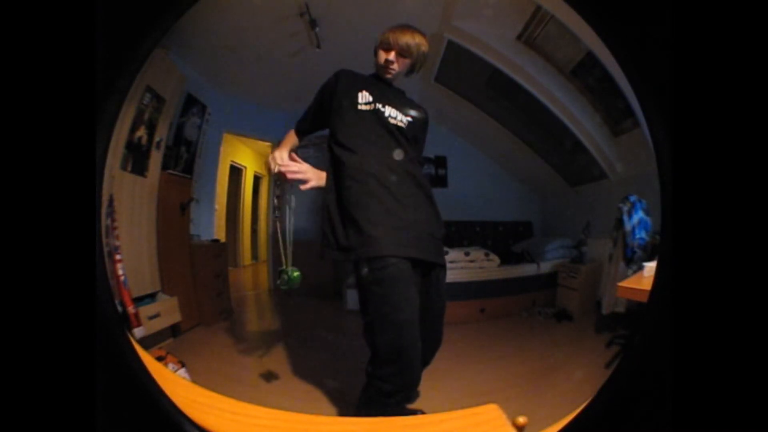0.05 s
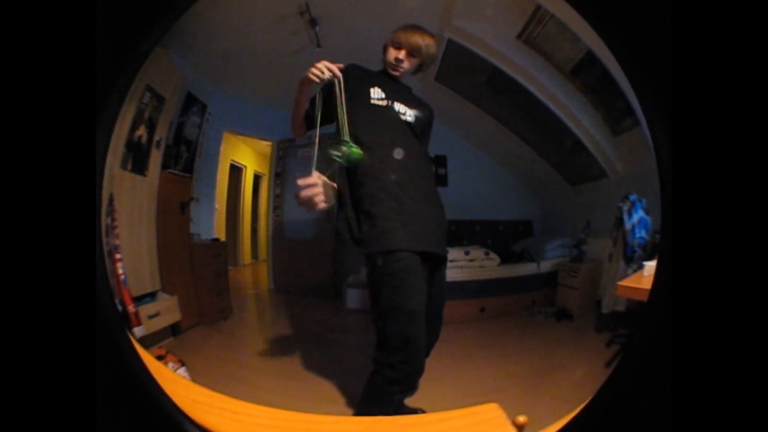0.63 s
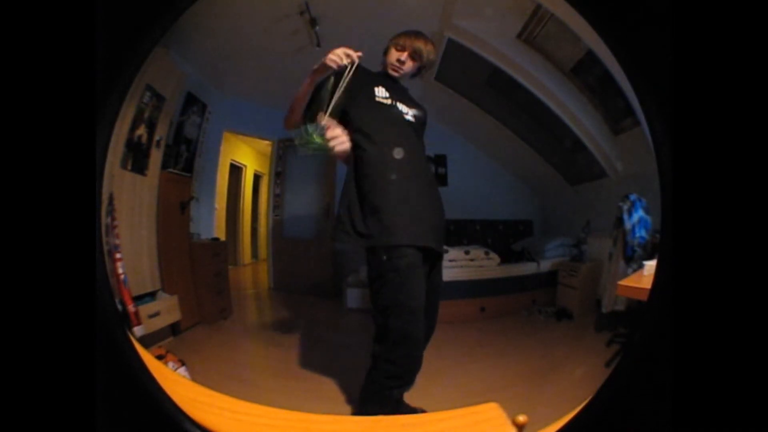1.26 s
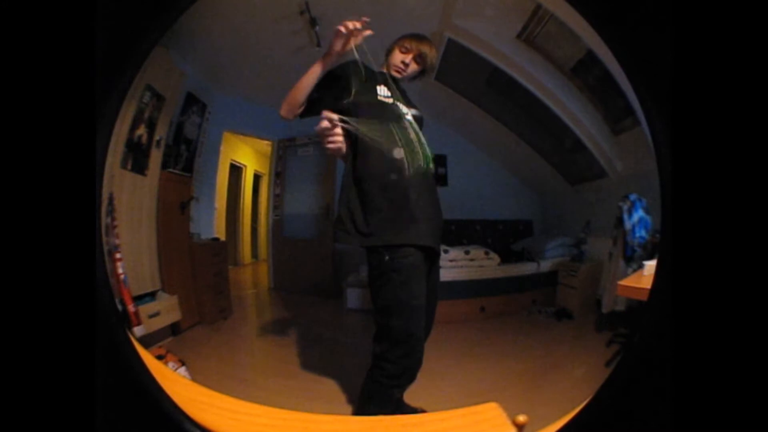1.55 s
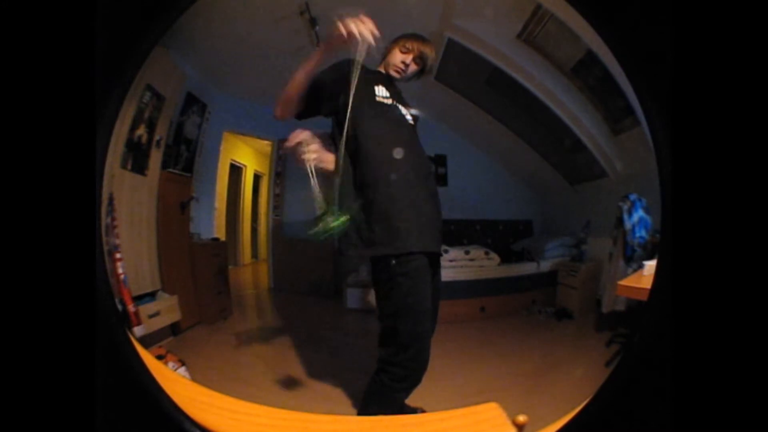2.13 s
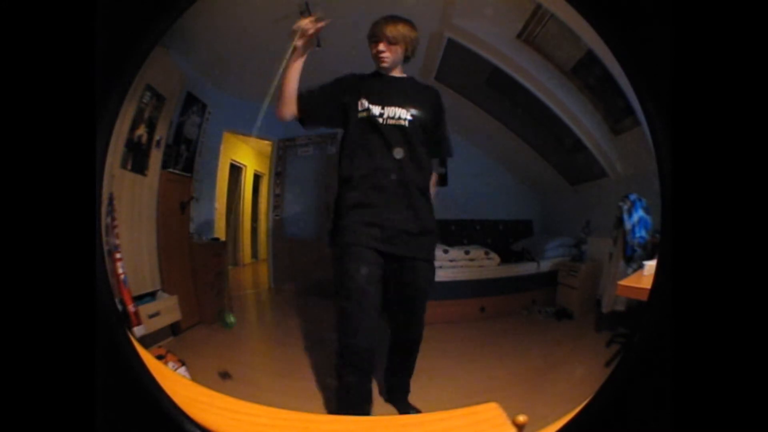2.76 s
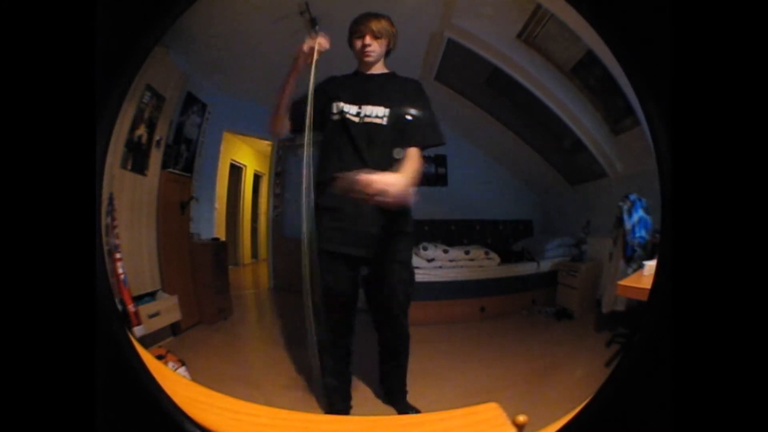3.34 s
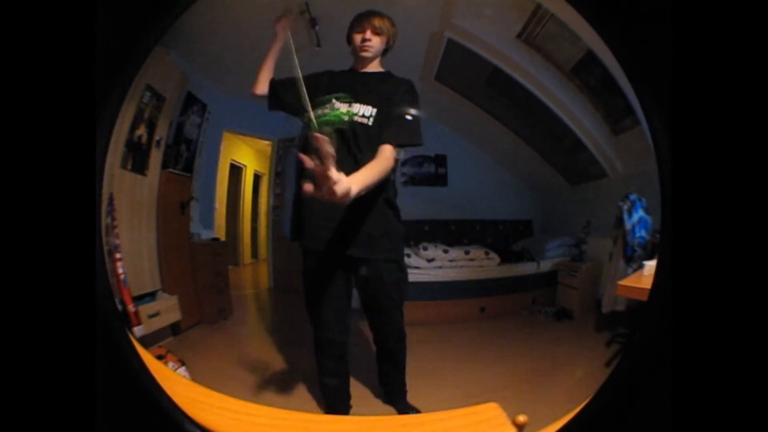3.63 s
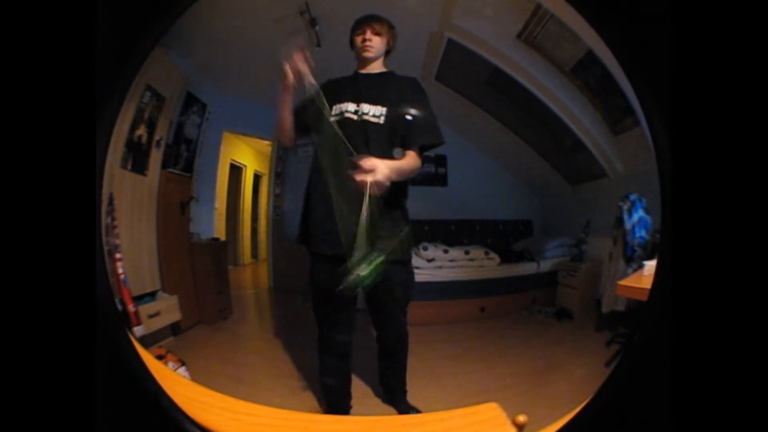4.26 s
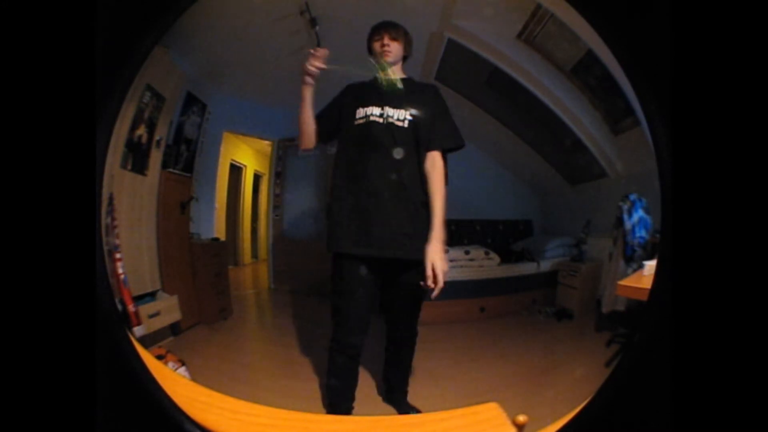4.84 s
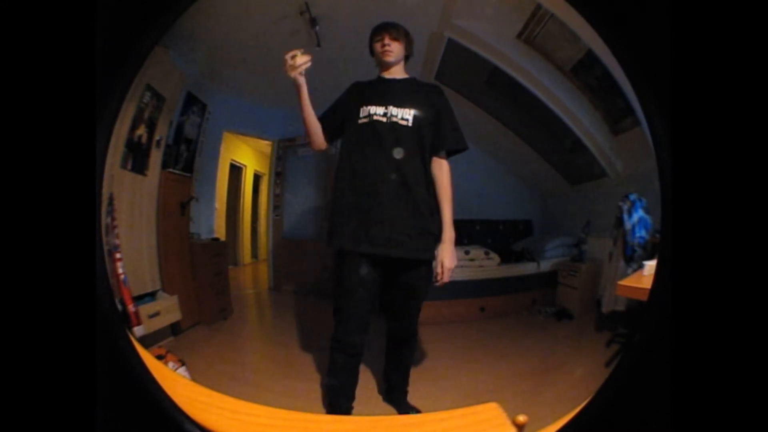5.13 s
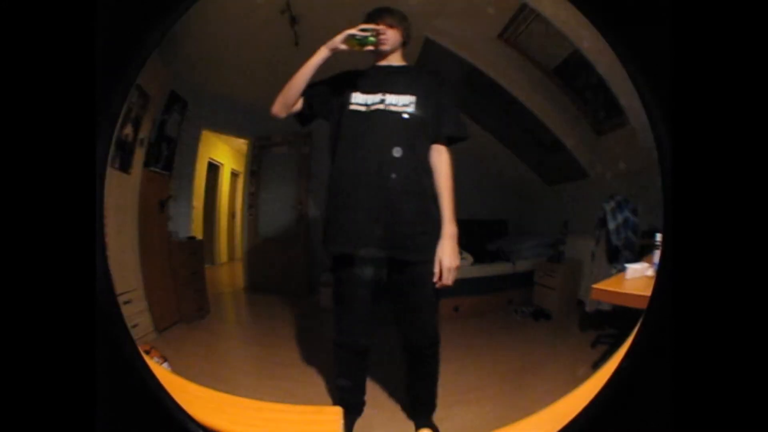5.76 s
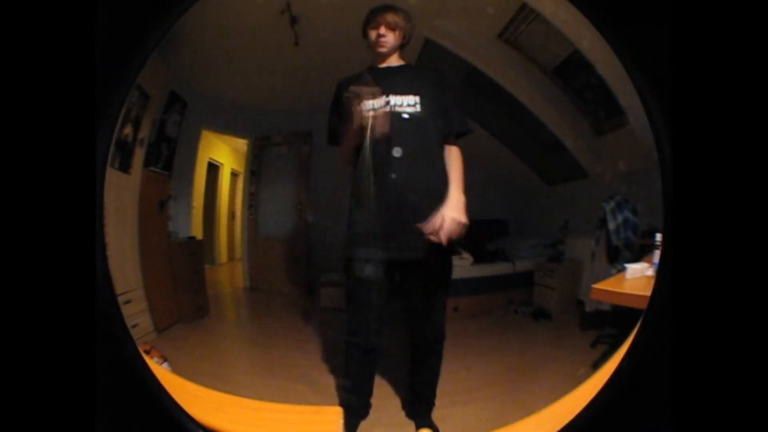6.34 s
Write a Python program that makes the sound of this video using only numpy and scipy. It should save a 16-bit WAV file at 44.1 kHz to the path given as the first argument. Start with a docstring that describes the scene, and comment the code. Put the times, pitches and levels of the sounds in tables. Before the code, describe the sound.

A yo-yo's dry bearing whirrs and its string hisses and snaps in a quiet room, with one catch in the hand and another throw.

```python
"""Yo-yo tricks in a quiet bedroom

A spinning yo-yo's dry ball bearing rattles and rings. The string hisses against the turning
halves and sings lengthwise as its free span changes. The yo-yo binds, climbs and smacks into
the palm; after a rest it is thrown again. Sleeves brush softly over a low room tone."""
import sys
import numpy as np
from scipy import signal
from scipy.fft import rfft, irfft, next_fast_len
from scipy.io import wavfile
from scipy.ndimage import uniform_filter1d, map_coordinates

SR = 44100
rng = np.random.default_rng(int(sys.argv[2]) if len(sys.argv) > 2 else 0)


def bounce(signal):
    """Save signal as a 16-bit WAV file at the path given by the first command-line argument."""
    frames = np.transpose(np.atleast_2d(signal))
    limited = np.clip(frames, -1, 1)
    pcm = np.round(limited * 32767).astype(np.int16)
    wavfile.write(sys.argv[1], SR, pcm)


N = 286650
TIME = np.arange(N) / SR


def amp(db):
    """Decibels to gain."""
    return 10 ** (np.asarray(db) / 20)


def unit(x):
    """x at rms 1."""
    return x / np.sqrt(np.mean(x ** 2) + 1e-20)


def along(points, hz):
    """(frequency, value) points read on a log axis."""
    freqs, values = np.transpose(points)
    return np.interp(np.log(hz + 1), np.log(freqs + 1), values)


def automation(points):
    """(time, value) points joined into one value per sample."""
    return np.interp(TIME, *np.transpose(points))


def wobble(rate):
    """A smooth random curve, rate knots a second."""
    return map_coordinates(rng.standard_normal(int(N * rate / SR) + 4), [TIME * rate])


def filtered(x, response):
    """x through a complex frequency response."""
    size = next_fast_len(len(x) + 8192)
    return irfft(rfft(x, size) * response(np.fft.rfftfreq(size, 1 / SR)), size)[:len(x)]


def coloured(x, eq):
    """x through an EQ curve, at rms 1."""
    return unit(filtered(x, lambda hz: amp(along(eq, hz))))


def resonate(x, modes):
    """x through parallel (frequency, width, gain) resonances."""
    return filtered(x, lambda hz: sum(amp(db) * 1j * hz * width / (centre**2 - hz**2 + 1j * hz * width)
                                      for centre, width, db in modes))


def swept(x, pitch, gain_at):
    """x through a filter gain_at(frequency, pitch) that follows a pitch curve, at rms 1."""
    hz, t, frames = signal.stft(x, SR, nperseg=512)
    gain = gain_at(hz[:, None], np.interp(t, TIME, pitch))
    return unit(signal.istft(frames * gain, nperseg=512)[1][:N])


def shimmer(x, depth_db):
    """x with passing resonances a few hundred Hz wide, at rms 1."""
    frames = signal.stft(x, nperseg=256)[2]
    patches = uniform_filter1d(rng.standard_normal(frames.shape), size=3, axis=0)
    patches = uniform_filter1d(patches, size=11, axis=1)
    return unit(signal.istft(frames * amp(depth_db * unit(patches)), nperseg=256)[1][:N])


def grains(rate, spread_db):
    """Tiny contacts at random times, of uneven size, at rms 1."""
    contacts = (rng.random(N) < rate / SR) * rng.standard_normal(N)
    return unit(contacts * amp(spread_db * rng.standard_normal(N)))


def decay(start, t60, attack):
    """The envelope of a hit."""
    age = np.maximum(TIME - start, 0)
    return amp(-60 * np.minimum(age / t60, 3)) * (1 - np.exp(-age / attack))


def swell(start, length, attack=0.015, t60=0.19):
    """Attack, hold and release of a sliding contact."""
    age = TIME - start
    fade_in = np.sin(np.pi / 2 * np.clip(age / attack, 0, 1)) ** 2
    return fade_in * amp(-60 * np.clip((age - length) / t60, 0, 3))


def add(track, start, sound):
    """Mix a short sound into the track, start seconds in."""
    part = track[round(start * SR):][:len(sound)]
    part += sound[:len(part)]


# EQ of the room's air: (frequency [Hz], gain [dB])
AIR_EQ = [(25, -29), (60, -19.5), (125, -6), (300, -4), (750, -1.5), (1150, -7.5), (2000, -8.5),
          (4000, -14), (7500, -18), (12000, -21), (14000, -21), (15800, -32)]
# low resonances of the hum: (frequency [Hz], width [Hz], gain [dB])
HUM_MODES = [(129.4, 10, -7.5), (612.5, 27, 6), (776, 104, 2)]
# partials of the electronic whine: (frequency [Hz], rms level [dB])
WHINE_PARTIALS = [(4743, -70), (9482, -72), (14225, -82)]


def room_tone():
    """A steady bed of air with a hollow hum and a faint, wavering electronic whine."""
    air = amp(-48.86) * coloured(rng.standard_normal(N), AIR_EQ)
    hum = amp(-56.5) * unit(resonate(rng.standard_normal(N), HUM_MODES))
    drifting_time = TIME + np.cumsum(0.00115 * wobble(13)) / SR
    whine = sum(amp(db) * np.sqrt(2) * np.sin(2 * np.pi * hz * drifting_time) for hz, db in WHINE_PARTIALS)
    return air + hum + whine


# the bedroom's reverb time: (frequency [Hz], t60 [s])
REVERB_T60 = [(200, 0.52), (2000, 0.45), (12000, 0.25)]


def bedroom_reverb(send):
    """A short diffuse tail after a 5 ms pre-delay, duller as it dies."""
    hz, t, frames = signal.stft(rng.standard_normal(SR // 2), SR, nperseg=256)
    tail = signal.istft(frames * amp(-60 * t / along(REVERB_T60, hz)[:, None]), SR, nperseg=256)[1]
    impulse = np.pad(tail, (SR // 200, 0)) / np.linalg.norm(tail)
    return signal.fftconvolve(send, impulse)[:N]


# EQ of sleeve on shirt: (frequency [Hz], gain [dB])
CLOTH_EQ = [(40, -45), (200, -22), (480, -2), (680, -4), (1000, -13), (2500, -13), (5000, -8), (9000, -17),
            (16000, -32)]
# swings of the arm: (start [s], length [s], level [dB])
SWINGS = [(2.803, 0.18, -49.5), (2.97, .07, -43.5), (4.6, .38, -53.5), (5.872, 0.13, -52.5),
          (6.163, 0.26, -50)]
SOFT_ATTACK_S, SOFT_T60_S = 0.039, 0.32


def sleeve():
    """Cloth brushes softly with each swing of the arm."""
    brush = sum(amp(db) * swell(start, length, SOFT_ATTACK_S, SOFT_T60_S) for start, length, db in SWINGS)
    return brush * coloured(rng.standard_normal(N), CLOTH_EQ)


# EQ of the slap on skin: (frequency [Hz], gain [dB])
PALM_EQ = [(200, -22), (600, -3), (1100, -11), (2200, -9), (4000, -18), (6000, -9), (8000, -14), (11000, 3),
           (13500, -3), (16000, -14)]
# hollow of the cupped hand: (frequency [Hz], width [Hz], gain [dB])
HAND_MODES = [(356, 42, -14), (467, 69, 3), (620, 91, 2), (1040, 75, 1)]
# ring of the yo-yo's halves: (frequency [Hz], relative level [dB], t60 [s])
SHELL_MODES = [(4807, -8, .06), (7300, -14, .07), (10490, -7, .08), (11780, -1, .18)]
# the yo-yo lands in the hand: (time [s], slap level [dB], thump level [dB], ring gain [dB])
LANDING = (5, -30, -36.5, -33.5)


def palm_catch():
    """The palm gives a soft slap and a hollow thump; the shell rings unevenly in the closing fingers."""
    start, slap_db, thump_db, ring_db = LANDING
    slap = decay(start, t60=0.068, attack=0.00095) * coloured(rng.standard_normal(N), PALM_EQ)
    thump = decay(start, t60=0.13, attack=0.0012) * unit(resonate(rng.standard_normal(N), HAND_MODES))
    jitter = wobble(500)
    ring = sum(amp(db) * decay(start, t60, attack=0.00091) * np.sin(2 * np.pi * hz * TIME + jitter)
               for hz, db, t60 in SHELL_MODES)
    return amp(slap_db) * slap + amp(thump_db) * thump + amp(ring_db) * ring


# EQ of the string's bright crack: (frequency [Hz], gain [dB])
CRACK_EQ = [(500, -37), (1500, -13), (3300, -1), (6000, -11), (10000, 5.5), (13000, 13), (16000, -17)]
# EQ of its dull tug on the finger: (frequency [Hz], gain [dB])
TUG_EQ = [(50, -45), (300, -14), (700, -3), (1500, -3), (2200, -3), (3500, -11), (8000, -16)]
# the string snaps tight or bites into the gap: (time [s], crack peak [dB], tug level [dB])
SNAP_CUES = [(1.633, -12.5, -53), (3.657, -13, -46), (3.919, -7.5, -42), (4.7165, -8, -61),
             (6.219, -22, -56), (6.361, -15.5, -49), (6.4194, -10.5, -32.5)]


def string_snaps():
    """A dry crack, a short rasp and a dull tug each time the string jerks taut."""
    jerks = np.zeros(N)
    for start, db, _ in SNAP_CUES:
        add(jerks, start, amp([db]))
    crack = coloured(jerks, CRACK_EQ)
    crack *= jerks.max() / np.abs(crack).max()
    rasp = sum(amp(db - 9) * decay(start, t60=0.03, attack=0.0004) for start, db, _ in SNAP_CUES)
    tug = sum(amp(db) * decay(start, t60=0.072, attack=0.001) for start, _, db in SNAP_CUES)
    rasp_noise, tug_noise = rng.standard_normal((2, N))
    return crack + rasp * coloured(rasp_noise, CRACK_EQ) + tug * coloured(tug_noise, TUG_EQ)


# spin of the yo-yo: (time [s], speed [turns/s])
SPIN_SPEED = [(0, 56), (2.4, 57), (3.7, 85), (4.6, 47), (5, 36), (6.1, 20), (6.45, 90)]


def rotation():
    """The yo-yo's angle in radians, turning at a slightly unsteady speed."""
    speed = automation(SPIN_SPEED) * (1 + 0.037 * wobble(17))
    return 2 * np.pi * np.cumsum(speed) / SR


def pressure(angle, once_db, twice_db, flutter_db):
    """Contact force swells once and twice a turn as the yo-yo wobbles, and flutters between."""
    return amp(once_db * np.sin(angle) + twice_db * np.sin(2 * angle) + flutter_db * wobble(450))


# moves that drag the string along the gap:
# (start [s], length [s], hiss fader [dB], song fader [dB], start pitch [Hz], end pitch [Hz])
STROKE_CUES = [(.07, 0.071, -38, -63, 2300, 2250), (.63, .08, -37, -69, 2270, 2100),
               (.8, 0.42, -47, -56, 2250, 2480), (1.09, .08, -30.5, -39.5, 2800, 2400),
               (1.17, .08, -30.5, -44.5, 1810, 1900), (1.27, 0.086, -30.5, -40.5, 2670, 2480),
               (1.4, .19, -43, -70, 2100, 2100), (1.605, 0.095, -30.5, -46.5, 1970, 1900),
               (1.78, 0.16, -34, -46.5, 1830, 1950), (2.06, 0.14, -36, -48, 2030, 1900),
               (2.19, .15, -31, -42, 1930, 1820), (2.35, 0.075, -39, -60, 2100, 2170),
               (2.655, 0.13, -34.5, -49.5, 2050, 2050), (2.98, 0.032, -39, -47, 2400, 2320),
               (3.37, 0.28, -36.5, -54.5, 2090, 2090), (3.62, 0.058, -29, -43, 2200, 2240),
               (3.73, 0.21, -35, -47.5, 1900, 2200), (3.9, .11, -32, -38.5, 3250, 3000),
               (4.02, .11, -39, -45, 2400, 1870), (4.14, .14, -32.5, -41, 2720, 2100),
               (4.3, 0.2, -38, -69, 2060, 2500), (4.49, 0.059, -32, -46, 2060, 2000),
               (4.57, 0.095, -39, -49, 1930, 1880)]


def strokes():
    """Each move swells the power of hiss and song and glides the span's pitch, which then holds."""
    hiss_power, song_power = np.zeros((2, N))
    pitch = np.full(N, float(STROKE_CUES[0][4]))
    for start, length, hiss_db, song_db, from_hz, to_hz in STROKE_CUES:
        stroke = swell(start, length)
        hiss_power += (amp(hiss_db) * stroke) ** 2
        song_power += (amp(song_db) * stroke) ** 2
        glide = np.interp(TIME, [start, start + length], [from_hz, to_hz])
        pitch = np.where(TIME < start, pitch, glide)
    return hiss_power, song_power, pitch


# the rattle follows the load on the string, dipping while the yo-yo floats: (time [s], fader [dB])
STRING_LOAD = [(0, -32), (.35, -32.5), (.55, -30), (1.5, -31), (2.05, -29.5), (2.4, -27.5), (2.53, -42.5),
               (2.62, -44.5), (2.67, -30.5), (2.85, -35), (3.45, -32), (3.65, -26.5), (4.25, -29.5),
               (4.55, -32), (4.7, -41)]
# fingers shift on the shell and settle the string: (start [s], length [s], hiss fader [dB])
FINGER_SHIFT = (5.55, 0.53, -61)
BIND_S, GRIP_S, THROW_S, UNWOUND_S = 4.715, 0.072, 6.125, 6.415
UNWIND_DB, UNWIND_DB_PER_S, SLEEP_DB = -51.5, 57, -29
GRAZE_HISS_DB, GRAZE_SONG_DB = -6.5, -31  # a hanging string always grazes the gap


def trick_faders(stroke_hiss_power, stroke_song_power):
    """Gains of rattle, hiss and song as the yo-yo hangs, binds, climbs, rests and is thrown."""
    hanging = amp(automation(STRING_LOAD)) * swell(-1.03, 1 + BIND_S + GRIP_S)
    grip = amp(-37.5) * swell(BIND_S, GRIP_S, attack=0.008, t60=0.052)
    climb = amp(-52.5) * swell(BIND_S, LANDING[0] - BIND_S)
    start, length, db = FINGER_SHIFT
    fingers = amp(db) * swell(start, length, SOFT_ATTACK_S, SOFT_T60_S)
    # the throw builds as it unwinds, then sleeps at full speed at the end of the string
    throw_db = np.where(TIME < UNWOUND_S, UNWIND_DB + UNWIND_DB_PER_S * (TIME - THROW_S), SLEEP_DB)
    thrown = amp(throw_db) * np.clip((TIME - THROW_S) / 0.02, 0, 1)
    rattle = hanging + amp(-1.5) * thrown
    hiss_power = (amp(GRAZE_HISS_DB) * hanging) ** 2 + grip ** 2 + climb ** 2 + fingers ** 2 + thrown ** 2
    song_power = (amp(GRAZE_SONG_DB) * hanging) ** 2 + (amp(-16) * thrown) ** 2
    return rattle, np.sqrt(hiss_power + stroke_hiss_power), np.sqrt(song_power + stroke_song_power)


# EQ of the string's free span: (frequency [Hz], gain [dB])
SPAN_EQ = [(1400, -44), (1650, 1.5), (1780, 7.5), (2800, 2), (3800, -1), (5200, 4), (7000, -9), (9000, 1.5),
           (12300, 12.5), (14000, -2), (16000, 5)]


def string_song(angle, pitch, reflection=0.62):
    """Friction waves run to and fro along the string: a comb of resonances that slides with its length."""
    def comb(hz, span_hz):
        return amp(along(SPAN_EQ, hz)) / np.abs(1 - reflection * np.exp(2j * np.pi * hz / span_hz))
    force = pressure(angle, once_db=-0.4, twice_db=1.0, flutter_db=0.9)
    slips = force * grains(rate=13000, spread_db=1.2)
    return amp(6) * swept(shimmer(slips, depth_db=2.4), pitch, comb)


# brief gliding bands of sliding string; the last is the bearing's ring sagging as the yo-yo binds:
# (start [s], length [s], start pitch [Hz], end pitch [Hz], level [dB])
GLIDE_CUES = [(0, 0.5, 6720, 7240, -44.5), (0.422, 0.4, 5950, 6040, -45), (0.75, 0.37, 7200, 7800, -38),
              (1.096, 0.11, 12500, 11100, -29), (1.176, 0.022, 6070, 6050, -34.5),
              (1.195, .11, 12000, 12700, -27.5), (1.263, 0.072, 5600, 5150, -36),
              (1.345, .072, 11700, 10360, -30.5), (1.393, 0.067, 6160, 6300, -38),
              (1.533, .062, 5990, 5680, -40.5), (1.6, .035, 8000, 9100, -28),
              (1.65, 0.088, 8700, 7300, -38), (1.82, .17, 11500, 10600, -35),
              (2.425, 0.047, 6130, 4940, -40), (3.562, .078, 6800, 7800, -34),
              (3.762, 0.15, 12400, 11440, -29.5), (3.908, .12, 13100, 12700, -31),
              (4.04, 0.1, 11300, 12150, -28), (4.116, 0.021, 8200, 8360, -26.5),
              (4.125, .08, 6000, 4730, -37.5), (4.15, .14, 12400, 11500, -27),
              (4.174, 0.11, 8700, 8320, -30.5), (4.3, 0.38, 7330, 7500, -42.5),
              (4.668, 0.14, 4920, 4950, -45.5)]


def gliding_bands(angle, width_hz=640):
    """Rough bands glide as sliding string shortens or lengthens; the last is the bearing's sagged ring."""
    bands = np.zeros(N)
    force = unit(pressure(angle, once_db=2.5, twice_db=-0.5, flutter_db=2.5))
    lowpass = signal.butter(2, width_hz / 2, fs=SR, output="sos")
    for start, length, from_hz, to_hz, db in GLIDE_CUES:
        progress = np.linspace(0, 1, round(length * SR))
        roughness = signal.sosfilt(lowpass, rng.standard_normal((2, SR)))[:, -len(progress):]
        phase = 2 * np.pi * np.cumsum(from_hz + (to_hz - from_hz) * progress) / SR
        band = unit(roughness[0] * np.cos(phase) + roughness[1] * np.sin(phase))
        arch = np.abs(np.sin(np.pi * progress)) ** 0.5
        add(bands, start, amp(db) * arch * band)
    return bands * force


# EQ of string rubbing in the gap: (frequency [Hz], gain [dB])
HISS_EQ = [(1500, -54), (3500, -24), (4200, -34), (4800, -14.5), (6600, -11), (8300, -2.5), (9100, -2.5),
           (10700, 3.5), (12300, -4), (13300, -7.5), (13900, -8), (15200, -8.5), (15800, -9.5)]


def string_hiss(angle):
    """String fibres catch and slip on the spinning walls of the gap."""
    slips = grains(rate=24000, spread_db=0.8) * pressure(angle, once_db=1.2, twice_db=1.1, flutter_db=1.3)
    return amp(2) * coloured(shimmer(slips, depth_db=3), HISS_EQ)


# the bearing catches for an instant: (time [s], peak [dB])
SQUEAK_CUES = [(0.638, -15), (0.7448, -9), (1.012, -14.5), (1.388, -13.5), (2.385, -15), (3.674, -16),
               (4.784, -20)]


def bearing_squeaks(rattle_gain, ring_hz=9900, low_hz=5170, rise_s=0.00061, fall_s=0.0014, per_s=3):
    """Each catch pings the main ring and a lower one; chance catches ride the rattle's fader."""
    t = np.arange(-SR // 100, SR // 100) / SR
    envelope = np.exp(-np.where(t < 0, (t / rise_s) ** 2, t / fall_s))
    ping = envelope * (np.sin(2 * np.pi * ring_hz * t) + amp(-17) * np.sin(2 * np.pi * low_hz * t))
    catches = (rng.random(N) < per_s / SR) * amp(8) * rattle_gain
    for start, db in SQUEAK_CUES:
        add(catches, start, amp([db]))
    return signal.fftconvolve(catches, ping, mode="same")


# steel rings of the bearing: (frequency [Hz], width [Hz], gain [dB])
BEARING_MODES = [(5170, 137, -6), (6170, 340, -20), (9684, 230, -1), (9930, 194, -2), (9955, 160, -1),
                 (14200, 350, -14)]


def bearing_rattle(angle, waver_db=1.5):
    """Dry balls chatter in the races and ring them; each ring waxes and wanes as the axle tilts."""
    chatter = grains(rate=14000, spread_db=1) * pressure(angle, once_db=0.6, twice_db=-0.5, flutter_db=3.1)
    rings = sum(amp(waver_db * wobble(12)) * resonate(chatter, [mode]) for mode in BEARING_MODES)
    return amp(-1.5) * unit(rings)


def scene():
    """The mono mix: bearing and string share one rotation; whirr and hits feed the reverb."""
    angle = rotation()
    stroke_hiss_power, stroke_song_power, pitch = strokes()
    rattle_gain, hiss_gain, song_gain = trick_faders(stroke_hiss_power, stroke_song_power)
    rattle = rattle_gain * bearing_rattle(angle)
    hiss = hiss_gain * string_hiss(angle)
    song = song_gain * string_song(angle, pitch)
    whirr = rattle + hiss + song + gliding_bands(angle) + bearing_squeaks(rattle_gain)
    hits = string_snaps() + palm_catch()
    send = amp(-9.5) * whirr + amp(-4.5) * hits
    return (whirr + hits + sleeve() + bedroom_reverb(send) + room_tone())[None]


HIGH_CUT_HZ = 15760


def record(dry):
    """A brick-wall high cut on the whole mix."""
    return filtered(dry[0], lambda hz: hz < HIGH_CUT_HZ)[None]


dry = scene()
out = record(dry)
bounce(out)
```